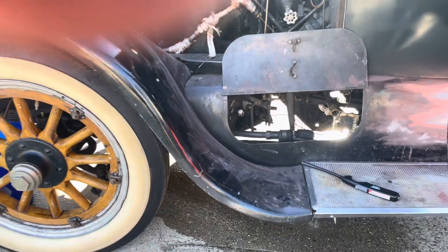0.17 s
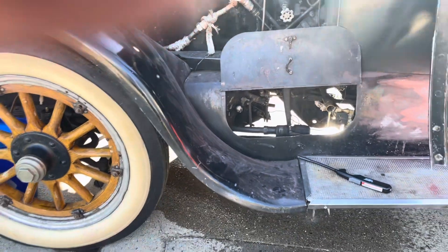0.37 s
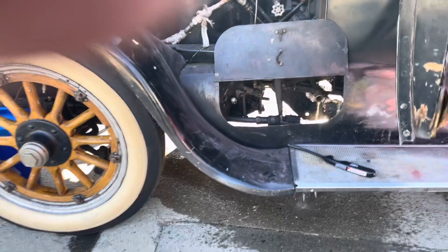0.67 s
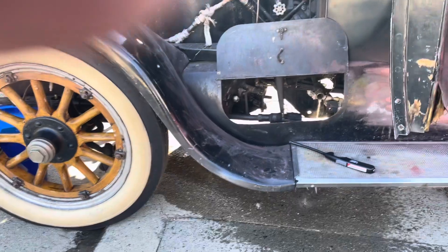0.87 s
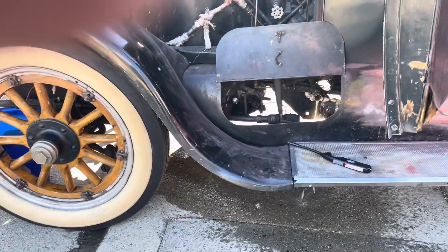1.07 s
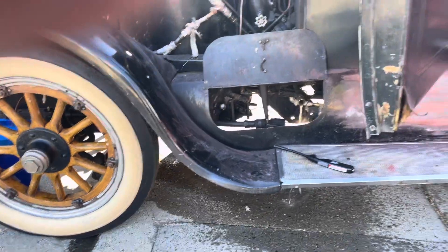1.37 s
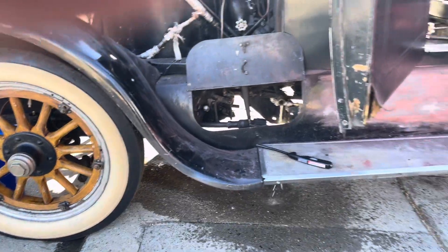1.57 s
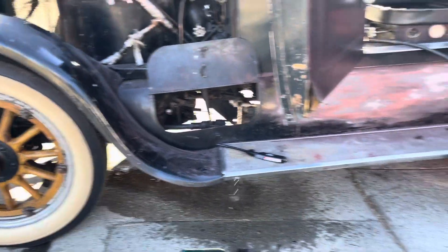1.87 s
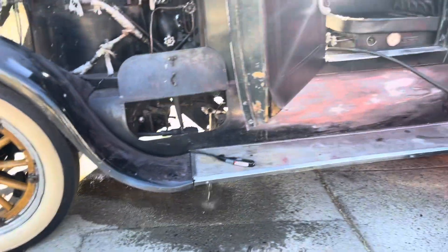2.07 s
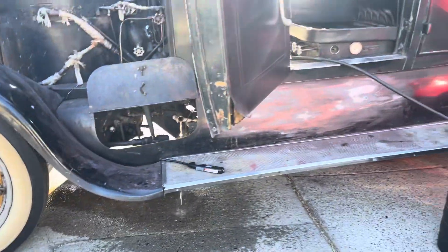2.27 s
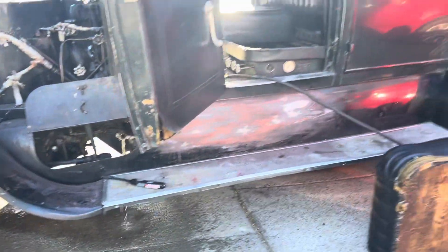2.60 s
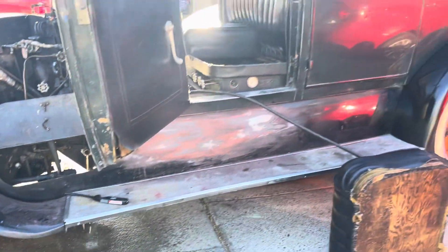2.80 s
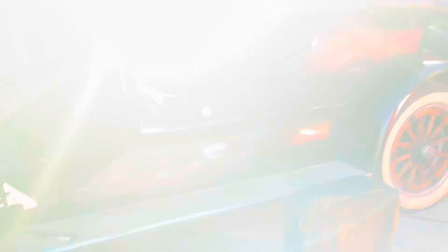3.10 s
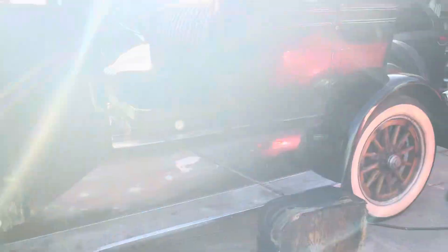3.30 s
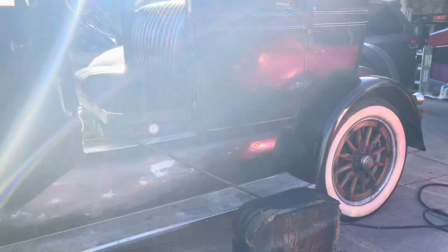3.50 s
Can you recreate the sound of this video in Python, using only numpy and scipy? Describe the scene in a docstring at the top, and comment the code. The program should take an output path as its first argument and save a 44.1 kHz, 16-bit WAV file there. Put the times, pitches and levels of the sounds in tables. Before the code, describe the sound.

Constant bright burner hiss with faint hollow howling, deep flame flutter and brief low thumps

```python
"""A steady hiss of jets runs throughout: the burner of an old steam car, heard by a phone carried along its side.
The hiss is coloured noise with short echoes; the burner tubes howl softly, as noise rung by hollow resonances.
The flame flutters low over a firebox roar, both made of deep noise.
Near the end a puff of steam buffets the microphone, as short low swings of pressure with some noise.
A few small ticks, perhaps droplets, land close by: each is a very short burst of a sine."""
import sys
import numpy as np
from scipy import signal
from scipy.fft import rfft, irfft
from scipy.io import wavfile
from scipy.ndimage import uniform_filter1d, map_coordinates

SR = 44100
rng = np.random.default_rng(int(sys.argv[2]) if len(sys.argv) > 2 else 0)


def to_wav(sig):
    """Store sig (one row per channel, or 1-D mono) as 16-bit WAV at the path in sys.argv[1].

    Samples outside -1..1 are clipped; the rate is SR.
    """
    pcm = np.clip(np.atleast_2d(sig), -1, 1) * 32767
    pcm = np.round(pcm).astype(np.int16)
    wavfile.write(sys.argv[1], SR, pcm.T)  # frames by channels


N = 160965

# the phone moves from beside the bonnet to beside the cab between these times
WALK_FROM_S, WALK_TO_S = 1.79, 2.48


def undb(db):
    """Decibels to gain."""
    return 10 ** (np.asarray(db) / 20)


def curve(rows, axis=1):
    """One column of a time table, joined by straight lines."""
    rows = np.array(rows)
    return np.interp(np.arange(N) / SR, rows[:, 0], rows[:, axis])


def ramp(from_s, to_s):
    """Rises from 0 to 1 between two times."""
    return np.clip((np.arange(N) / SR - from_s) / (to_s - from_s), 0, 1)


def freqs():
    """Frequencies of the spectrum's bins in Hz, kept at 1 or more to allow logs and division."""
    return np.maximum(np.arange(N // 2 + 1) * SR / N, 1)


def colour(rows, axis=1):
    """One column of a spectrum table, joined on a log-frequency axis."""
    rows = np.array(rows)
    return np.interp(np.log(freqs()), np.log(rows[:, 0]), rows[:, axis])


def filtered(x, response):
    """Shape the spectrum of a sound."""
    return irfft(rfft(x) * response, N)


def low_part(x, split_hz):
    """What lies below a split frequency, with a steep edge."""
    return filtered(x, 1 / (1 + (freqs() / split_hz) ** 8))


def unit(x):
    """Scale to rms 1."""
    return x / np.sqrt(np.mean(x ** 2))


def walk(rate_hz):
    """Smooth random wandering with a spread of 1; a higher rate wanders faster."""
    return unit(filtered(rng.standard_normal(N), np.exp(-(freqs() / rate_hz) ** 2)))


def hold(x, share, span_s):
    """Even out the strength of a sound over the given time (share 0-1); rms 1."""
    power = np.mean(x ** 2, axis=0)
    strength = np.sqrt(uniform_filter1d(power, int(span_s * SR)))
    return unit(x / strength ** share)


def pan(db):
    """Gains of the left and right channel for a left-right difference."""
    return undb(np.array([[1], [-1]]) * db / 2)


def noise(gain, coherence, lead=0):
    """Turbulence at two microphone ports, partly shared; left leads by the given radians."""
    mid, side = rfft(rng.standard_normal((2, N)))
    shared = np.clip(coherence, 0, 1)
    sign = np.array([[1], [-1]])
    pair = mid * np.sqrt((1 + shared) / 2) + sign * side * np.sqrt((1 - shared) / 2)
    turn = np.exp(1j * sign * lead / 2)
    return irfft(pair * gain * turn, N) * np.sqrt(SR / 2)


def resonance(hz, width_hz):
    """Response of one resonance, 1 at its centre."""
    f = freqs()
    return 1 / (1 + 1j * (f / hz - hz / f) * hz / width_hz)


# Small ticks close by. Each row: time in seconds, level in dB, pitch in Hz, length in ms,
# left-right difference in dB, lag of the right port in ms.
TICK_ROWS = [(.2436, -22, 2300, .3, 4, 0.032), (.2445, -35, 2000, .35, 8, 0.0078),
             (.2453, -23, 990, 0.35, -4, 0), (3.013, -29.5, 698.6, 0.51, 4, 0),
             (3.0763, -13.5, 1670, 0.53, -3, 0.086)]


def ticks():
    """Dry ticks: a sine that swells and dies within a very few cycles."""
    t, out = np.arange(N) / SR, 0
    for at, db, hz, length_ms, pan_db, lag_ms in TICK_ROWS:
        # half the lag makes the left early, the other half makes the right late
        age = t - at - np.array([[-1], [1]]) * lag_ms / 2000
        shape = np.exp(-(1000 * age / length_ms) ** 2)
        out = out - undb(db) * pan(pan_db) * shape * np.sin(2 * np.pi * hz * age)
    return out


# Gusts of the steam puff on the microphone.
# Each row: time in seconds, length in seconds, level in dB, centre in Hz.
GUST_ROWS = [(1.821, .008, -30.5, 75), (2.32, .006, -26.5, 140), (2.407, .02, -35, 90),
             (2.795, .014, -27.5, 95), (2.843, .0055, -18.5, 145), (2.858, .011, -28, 265),
             (2.858, .013, -38, 480), (2.869, .019, -24, 103), (2.922, .006, -25, 240),
             (2.934, .012, -26.5, 170), (3.11, .014, -33, 90), (3.135, .010, -26, 88),
             (3.168, .018, -23, 62)]
GUST_ROUGH = .18  # turbulent share of a gust's power (0-1)
GUST_FOCUS = 2.2  # higher keeps the turbulence closer to the centre
GUST_COHERENCE, GUST_STEADY_S = .5, .0105


def gusts():
    """Eddies strike the microphone, each a short low swing of pressure with turbulence around it."""
    t, out = np.arange(N) / SR, 0
    for at, length_s, db, hz in GUST_ROWS:
        ratio = freqs() / hz
        spectrum = (ratio * np.exp(-ratio ** 2 / 2)) ** GUST_FOCUS
        eddy = hold(noise(spectrum, GUST_COHERENCE), 1, GUST_STEADY_S)
        swing = np.sqrt(2) * np.cos(2 * np.pi * (hz * t + rng.random()))
        gust = np.sqrt(1 - GUST_ROUGH) * swing + np.sqrt(GUST_ROUGH) * eddy
        out = out + gust * undb(db) * np.exp(-((t - at) / length_s) ** 2)
    return out


# Steady low roar of the firebox. Each row: frequency in Hz, level in dB per Hz.
ROAR_COLOUR = [(25, -84), (80, -88.5), (170, -78.5), (280, -86), (400, -76.5), (650, -103.5), (1500, -105)]


def firebox_roar():
    """Steady deep turbulence of the firebox, nearly alike at both ports."""
    return noise(undb(colour(ROAR_COLOUR)), coherence=0.94)


# Colour of the flame's rumble. Each row: frequency in Hz, relative level in dB.
FLAME_COLOUR = [(20, -32), (35, -6), (52, 3), (75, 6), (105, -0.5), (150, -9), (210, -12), (320, -21),
                (600, -36), (1500, -102)]
# Each row: time in seconds, rumble level in dB, change of its deepest part in dB.
FLAME_LEVEL_ROWS = [(0, -49, -13), (.18, -48, -30), (.32, -39, -2), (.9, -40.5, -8), (1.43, -41, -1),
                    (1.82, -39.5, -2), (1.92, -42, 2), (2.25, -44, 0), (2.4, -42.5, 8), (2.68, -43.5, -2),
                    (2.8, -35.5, 1), (2.94, -39.5, 11), (3.0, -38, 2), (3.08, -42.5, 8), (3.17, -35, 5),
                    (3.24, -50, -11), (3.65, -53, -10)]
DEEP_HZ = 60  # the deepest part lies below this
BASS_COHERENCE = .93
FLUTTER_DB, FLUTTER_RATE_HZ = 1.7, 22
FLAME_HOLD, FLAME_HOLD_S = .7, .1  # how far the flame holds its strength (0-1), and over what time


def flame():
    """The flame's low rumble: deep noise with a fluttering level, nearly alike at both ports."""
    rumble = noise(undb(colour(FLAME_COLOUR)), BASS_COHERENCE)
    rumble = rumble * undb(FLUTTER_DB * walk(FLUTTER_RATE_HZ))
    rumble = hold(rumble, FLAME_HOLD, FLAME_HOLD_S)
    deep = low_part(rumble, DEEP_HZ)
    rumble = rumble - deep + deep * undb(curve(FLAME_LEVEL_ROWS, axis=2))
    return rumble * undb(curve(FLAME_LEVEL_ROWS))


# Hollow resonances of the burner tubes. Each row: frequency in Hz, width in Hz, base level in dB,
# change of level beside the cab in dB, left-right difference in dB, coherence from 0 to 1, waver in dB.
TUBE_ROWS = [(369, 51, -57, -2, 3, 1, 3.5), (438.6, 58, -57, 3, 0.5, 0.75, 3),
             (780, 32, -63.5, -2, 10, 0.5, 3), (925.5, 51, -47, .5, 3, 0.8, 1.44),
             (1319, 85, -51.5, -0.5, 4.5, 0.7, 2), (1423, 17, -60.5, 5, -2, 0.77, 0.5),
             (1818.5, 32.4, -45.5, 2, -.5, 0.99, 1.7), (2140, 160, -63, 7, -1, 0.7, 1)]
# Each row: time in seconds, level change of the lower resonances in dB, of the upper ones in dB.
HOWL_ROWS = [(0, 3, -2), (.38, 2.9, -6), (.58, 2.5, -1.5), (.78, 3.5, -.5), (.94, 1, 4.5), (1.1, 2.5, -2.5),
             (1.3, 0.8, -4), (1.56, 2, 4.5), (1.75, 1.5, 0), (1.95, 0.5, -2), (2.32, 1.2, 0),
             (2.58, -0.5, -2.5), (2.75, -0.5, -2), (2.9, 0, -6), (3.25, -2.5, 0), (3.65, -3.5, -2)]
# Each row: time in seconds, pitch of the lower resonances, of the upper ones, in per cent off their rest.
PITCH_ROWS = [(0, -0.4, 1.2), (.6, .3, 0.67), (.9, 0.92, -.8), (1.05, 1.85, -.1), (1.4, 1.3, -0.019),
              (1.8, -0.49, -0.81), (2.15, -0.63, -0.38), (2.35, -0.17, 0.53), (3.65, 0.58, -0.13)]
# Each row: time in seconds, lag of the right port behind the left in ms.
LAG_ROWS = [(0, .02), (1.1, -.03), (1.65, .02), (1.95, .09), (2.55, .13), (3.15, .19), (3.65, .26)]
UPPER_HZ = 1600  # resonances above this count as upper
TUBE_HOLD, TUBE_HOLD_S = .45, .02  # how far a ringing tube holds its strength (0-1), over what time
TUBE_DRIFT, TUBE_DRIFT_RATE_HZ = 0.00392, 5.26  # pitch drift as a fraction
TUBE_WAVER_RATE_HZ = 16


def tubes():
    """The flow rings the burner tubes; each resonance wavers, and their pitch wanders with the flow."""
    drift = TUBE_DRIFT * walk(TUBE_DRIFT_RATE_HZ)
    lag = curve(LAG_ROWS) * SR / 1000  # in samples
    moved, out = ramp(WALK_FROM_S, WALK_TO_S), 0
    for hz, width_hz, db, cab_db, pan_db, coherence, waver_db in TUBE_ROWS:
        column = 2 if hz > UPPER_HZ else 1
        # a second, wider resonance trims the skirts of the first
        ring = noise(resonance(hz, width_hz) * resonance(hz, 5.9 * width_hz), coherence)
        left, right = hold(ring, TUBE_HOLD, TUBE_HOLD_S)
        # reading the ringing faster or slower bends its pitch
        at = np.arange(N) + np.cumsum(drift + curve(PITCH_ROWS, axis=column) / 100)
        left = map_coordinates(left, [at], mode="mirror")
        right = map_coordinates(right, [at - lag], mode="mirror")
        waver = waver_db * walk(TUBE_WAVER_RATE_HZ)
        level_db = db + curve(HOWL_ROWS, axis=column) + cab_db * moved + waver
        out = out + np.array([left, right]) * pan(pan_db) * undb(level_db)
    return out


# reflections from bodywork and ground: first delays, how fast they slide at most, level of all together
ECHO_NEAR_S, ECHO_FAR_S, ECHO_SLIDE_S_PER_S, ECHO_DB = 0.001019, .011, 0.0001446, -9.5


def reflect(x, count=7):
    """Short sliding echoes comb the sound and give it a faintly hollow, shifting colour."""
    t, out = np.arange(N) / SR, x
    for place, slide in rng.random((count, 2)):
        start_s = ECHO_NEAR_S + place * (ECHO_FAR_S - ECHO_NEAR_S)
        delay = start_s + (2 * slide - 1) * ECHO_SLIDE_S_PER_S * t
        echo = np.array([map_coordinates(port, [(t - delay) * SR], mode="mirror") for port in x])
        out = out + echo * undb(ECHO_DB) / np.sqrt(count)
    return out / np.sqrt(1 + undb(ECHO_DB) ** 2)


# Colour of the jets' hiss.
# Each row: frequency in Hz, level in dB per Hz beside the bonnet, level in dB per Hz beside the cab.
HISS_COLOUR = [(700, -83.5, -81), (1110, -80, -81), (1690, -79.5, -79), (2040, -76, -80),
               (2250, -74.5, -75.5), (2690, -80.5, -78), (3950, -72.5, -73), (3900, -75.5, -73.5),
               (5300, -75, -73.5), (6060, -75, -71.5), (6800, -73.5, -72.5), (7300, -71, -72.5),
               (8940, -69.5, -74), (10540, -69, -69.5), (12070, -71, -67.5), (13000, -71.5, -72.5),
               (14400, -71, -74.5), (15600.0, -76.5, -82.5)]
# Each row: frequency in Hz, left-right difference in dB beside the bonnet, the same beside the cab.
BALANCE_ROWS = [(650.0, -0.5, 4.1), (2280, -0.5, 1.8), (3000, 2, 8), (3870, -2, 4.9), (4440, 0.5, 1.0),
                (6100, -1, 5.6), (7160, 0.5, 0.36)]
# The hiss at the two microphone ports. Each row: frequency in Hz, coherence from 0 to 1 beside the bonnet,
# coherence beside the cab, radians by which left leads beside the bonnet, the same beside the cab.
PORT_ROWS = [(650.0, 0.66, 0.5, 0.3, 0.6), (1550.0, 0.58, 0.54, 0.3, 1.4), (2250.0, 0.89, 0.17, 0.2, -0.0),
             (2800.0, 0.51, 0.45, 0.7, 0.5), (3700.0, 0.66, 0.35, 0.8, -0.5), (4500.0, 0.8, 0.77, 0.3, 0.2),
             (5300.0, 0.39, 0.22, -4.0, -0.1), (6100.0, 0.41, 0.53, -2.5, -1.1),
             (6900.0, 0.55, 0.44, -0.8, -1.7), (7700.0, 0.85, 0.81, -2.7, -2.9),
             (8350.0, 1.0, 1.0, -3.1, -3.1), (9200.0, 1.0, 1.0, -3.2, -3.2),
             (10200.0, 0.76, 0.76, -4.0, -3.8), (11800.0, 0.72, 0.78, -5.3, -5.3),
             (12700.0, 1.0, 1.0, -6.28, -6.28)]
# Each row: time in seconds, level change of the hiss below the split in dB, above the split in dB.
HISS_LEVEL_ROWS = [(0, .5, 1.1), (.55, 1.6, 1.5), (1.05, 2.1, 1.8), (1.75, -.6, .3), (2.3, -1.9, 1),
                   (2.85, 0, 1), (3.65, 1.2, 1)]
HISS_SPLIT_HZ = 7500
CENTRED_HZ = 8200  # from here up, left and right are equally loud
HISS_FLICKER_DB, HISS_FLICKER_RATE_HZ = .35, 18
# a hollow opens in the middle of the hiss near the end
HOLLOW_FROM_S, HOLLOW_TO_S, HOLLOW_HZ, HOLLOW_WIDTH_HZ, HOLLOW_DB = 2.99, 3.23, 1700, 377, -9.5


def jets():
    """Broad turbulent hiss of the jets, whose colour changes as the phone moves along the car."""
    moved = ramp(WALK_FROM_S, WALK_TO_S)
    hiss = 0
    for place, share in ((1, 1 - moved), (2, moved)):
        balance = pan(colour(BALANCE_ROWS, axis=place) * (freqs() < CENTRED_HZ))
        bass_slope = np.minimum(freqs() / HISS_COLOUR[0][0], 1)
        gain = undb(colour(HISS_COLOUR, axis=place)) * balance * bass_slope
        coherence, lead = colour(PORT_ROWS, axis=place), colour(PORT_ROWS, axis=place + 2)
        hiss = hiss + np.sqrt(share) * noise(gain, coherence, lead)

    middle = filtered(hiss, np.exp(-((freqs() - HOLLOW_HZ) / HOLLOW_WIDTH_HZ) ** 2))
    hiss = hiss - middle + middle * undb(HOLLOW_DB * ramp(HOLLOW_FROM_S, HOLLOW_TO_S))

    low = low_part(hiss, HISS_SPLIT_HZ)
    high = hiss - low
    flicker_db = HISS_FLICKER_DB * walk(HISS_FLICKER_RATE_HZ)
    high_db = curve(HISS_LEVEL_ROWS, axis=2) + flicker_db
    return low * undb(curve(HISS_LEVEL_ROWS)) + high * undb(high_db)


def scene():
    """Ticks, steam and burner together; only the hiss gets echoes."""
    return ticks() + gusts() + firebox_roar() + flame() + tubes() + reflect(jets())


LOW_CUT_HZ, TOP_HZ = 26, 15750


def record(dry):
    """The phone thins the deepest bass and cuts the top steeply."""
    thin = filtered(dry, 1 / (1 + (LOW_CUT_HZ / freqs()) ** 6))
    top_cut = signal.ellip(12, .1, 90, TOP_HZ, fs=SR, output="sos")
    return signal.sosfilt(top_cut, thin)


dry = scene()
out = record(dry)
to_wav(out)
```